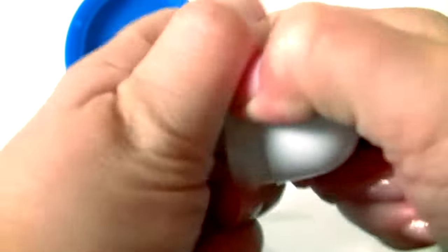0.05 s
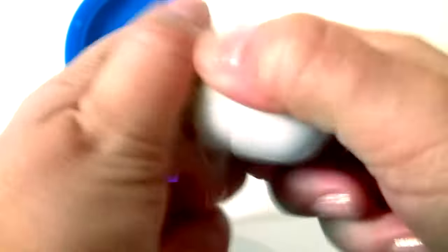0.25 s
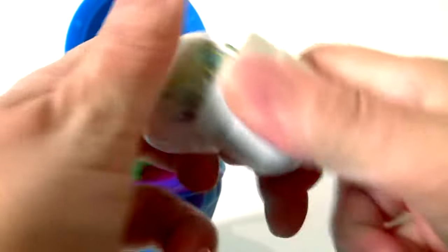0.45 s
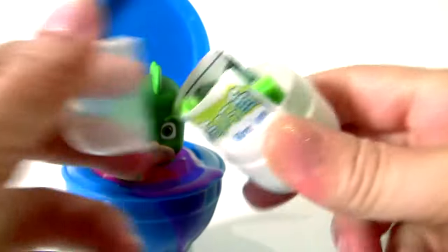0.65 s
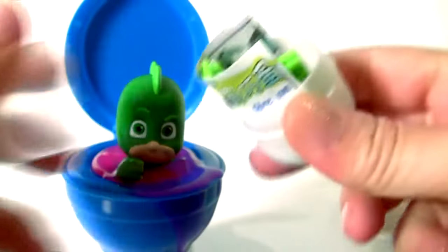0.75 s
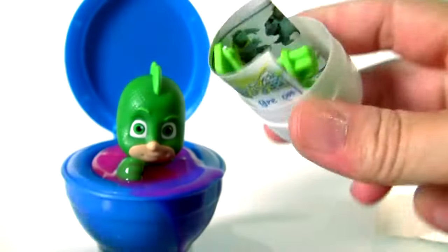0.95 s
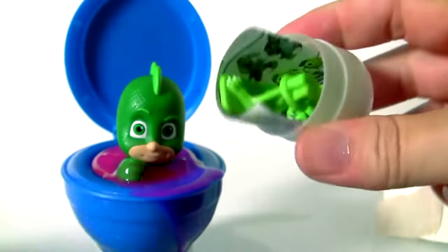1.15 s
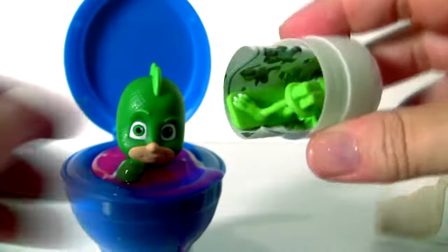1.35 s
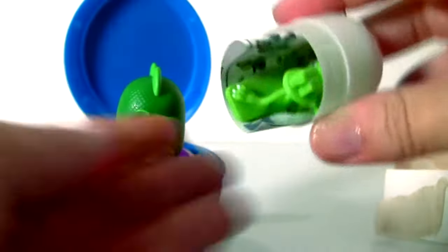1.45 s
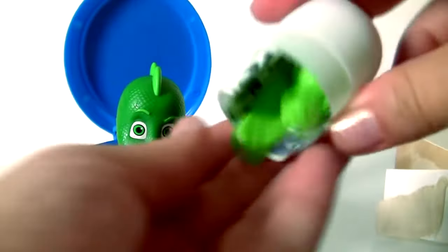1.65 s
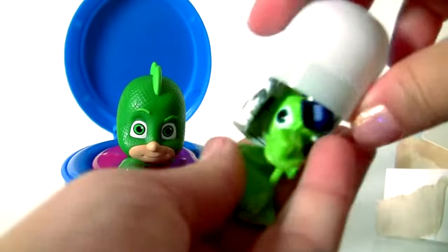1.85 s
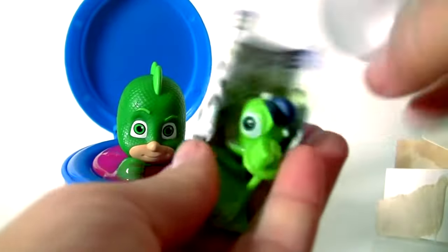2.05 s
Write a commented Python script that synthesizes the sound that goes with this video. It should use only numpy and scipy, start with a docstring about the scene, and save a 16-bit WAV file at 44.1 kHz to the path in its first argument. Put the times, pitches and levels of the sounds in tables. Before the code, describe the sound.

A small plastic capsule pops open with a hard snap and brief crackles, paper and plastic rustle, then a little toy rattles in the hollow cup; close microphone, quiet small room with faint hum.

```python
"""A quiet room lies under everything: noise air, a fan-like drone of narrow noise bands, two hum sines.
Hands rub a plastic egg capsule (grainy noise and moving resonances); edges ping (narrow noise bursts).
Shell and paper snap, hardest from 0.2 s (decaying thumps, cup rings, treble cracks).
From 1.14 s a small toy rattles in the cup (decaying modes, hard knocks tick; two sharp knocks are built
like snaps); late rubbing swells again. A short diffuse echo from the walls follows all close sounds."""
import sys
import numpy as np
from scipy import signal
from scipy.fft import rfft, irfft, next_fast_len
from scipy.io import wavfile
from scipy.ndimage import uniform_filter1d, map_coordinates

SR = 44100
rng = np.random.default_rng(int(sys.argv[2]) if len(sys.argv) > 2 else 0)


def to_wav(sig):
    """Store sig (one row per channel, or 1-D mono) as 16-bit WAV at the path in sys.argv[1].

    Samples outside -1..1 are clipped; the rate is SR.
    """
    pcm = np.clip(np.atleast_2d(sig), -1, 1) * 32767
    pcm = np.round(pcm).astype(np.int16)
    wavfile.write(sys.argv[1], SR, pcm.T)  # frames by channels


N = 92610
RISE_SHARE = 0.077  # rise time constant of snaps and pings over their t60


def amp(db):
    """Decibels to amplitude factor."""
    return 10 ** (np.asarray(db) / 20)


def unit(x):
    """x scaled to an rms of 1."""
    return x / np.sqrt(np.mean(np.abs(x) ** 2) + 1e-20)


def along(points, hz):
    """Interpolate (frequency, value) points on a log frequency axis."""
    f, v = np.transpose(points)
    return np.interp(np.log(hz + 1), np.log(f + 1), v)


def curves(rows):
    """One value per sample for each column after the time."""
    s, *cols = np.transpose(rows)
    return [np.interp(np.arange(N) / SR, s, c) for c in cols]


def wobble(knots_per_s):
    """Smooth random curve through normal knots."""
    knots = rng.standard_normal(int(N * knots_per_s / SR) + 4)
    return map_coordinates(knots, [np.arange(N) * knots_per_s / SR])


def filtered(x, response):
    """x times a complex response of frequency."""
    m = next_fast_len(N + SR // 2)
    return irfft(rfft(x, m) * response(np.fft.rfftfreq(m, 1 / SR)), m)[..., :N]


def passed(x, hz, kind, order):
    """Butterworth low- or high-pass."""
    return signal.sosfilt(signal.butter(order, hz, kind, fs=SR, output="sos"), x)


def peaks(rows):
    """Sum of causal second-order resonances with alternating sign."""
    def response(f):
        total = 0
        for k, (centre, width, db) in enumerate(rows):
            band = 1j * f * width
            total = total + (-1) ** k * amp(db) * band / (centre * centre - f * f + band)
        return total
    return response


def noise(response):
    """White noise through a response, at unit rms."""
    return unit(filtered(rng.standard_normal(N), response))


def coloured(points):
    """Noise with a (frequency, dB) spectrum, at unit rms."""
    return noise(lambda hz: amp(along(points, hz)))


def moving_ring(hz, width_hz):
    """Noise in one resonance: two slow noises modulate a carrier whose pitch follows a curve."""
    slow_cos, slow_sin = [noise(lambda f: 1 / (1 + 1j * f / width_hz) ** 2) for _ in "ab"]
    phase = 2 * np.pi * np.cumsum(hz) / SR
    return slow_cos * np.cos(phase) + slow_sin * np.sin(phase)


def pan(x, left_minus_right_db):
    """Split a level difference evenly between left and right."""
    half_db = left_minus_right_db / 2
    return x * amp([[half_db], [-half_db]])


# side noise against mid noise: (frequency [Hz], level [dB])
SIDE_SPREAD = [(1000, -53), (4000, -10), (8000, -4), (16000, -5)]


def wide(points):
    """Coloured stereo noise, less alike in the treble: independent side noise is added."""
    side = filtered(coloured(points), lambda hz: amp(along(SIDE_SPREAD, hz)))
    return coloured(points) + np.array([side, -side])


def patchy(x, depth_db):
    """x with patches of random gain in time and frequency, at unit rms."""
    z = signal.stft(x, nperseg=128)[2]
    field = rng.standard_normal(z.shape[-2:])
    field = uniform_filter1d(field, size=4, axis=0)
    field = uniform_filter1d(field, size=5, axis=1)
    return unit(signal.istft(z * amp(depth_db * unit(field)), nperseg=128)[1][..., :N])


# spectrum of room air: (frequency [Hz], relative density [dB per Hz])
AIR_SPECTRUM = [(20, -42), (45, -28), (100, -8), (250, -4), (600, -4.5), (1000, -11), (2000, -14.5),
                (4000, -26), (8000, -31), (14500, -32.5), (16000, -46)]
# air and drone between the sides: (frequency [Hz], left-right likeness [correlation])
AIR_LIKENESS = [(50, 0.044), (300, 0.31), (1000, 0.55), (5000, 0.043), (15000, 0.067)]
# narrow noise bands: (centre [Hz], width [Hz], relative level [dB])
DRONE_BANDS = [(345, 12.6, -1.5), (552, 17, -6), (779.3, 15.3, 1)]
# mains hum: (frequency [Hz], mean level [dB rms], left lead [rad])
HUM_TONES = [(30, -69, 0.8), (60, -69, 1.3)]
AIR_DB, DRONE_DB, AIR_PAN_DB = -55.5, -56, -1.7


def room():
    """Air noise and resonant drone, partly shared by the sides, plus hum sines of wavering level."""
    def turn(hz):
        return np.arccos(np.clip(along(AIR_LIKENESS, hz), -1, 1)) / 2

    pair = []
    for _ in "ab":
        air = amp(AIR_DB) * coloured(AIR_SPECTRUM)
        drone = amp(DRONE_DB + 1.5 * wobble(6.9)) * noise(peaks(DRONE_BANDS))
        pair.append(air + drone)
    mid, side = filtered(np.array(pair), lambda hz: np.array([np.cos(turn(hz)), np.sin(turn(hz))]))

    t, hum = np.arange(N) / SR, 0
    for hz, db, lead in HUM_TONES:
        tone = np.sin(2 * np.pi * hz * t + np.array([[lead], [0]]))
        hum = hum + 2 ** .5 * amp(db + 0.43 * wobble(3.9)) * tone
    return pan(np.array([mid + side, mid - side]), AIR_PAN_DB) + hum


# rubbing and sliding: (time [s], air ring of the cup [dB], upper rings [dB], treble rustle [dB],
# air ring pitch [Hz])
RUB_MOVES = [(0, -76, -91, -74, 1800), (.05, -84, -95, -63.5, 1810), (.2, -79, -68, -68.5, 1812),
             (.21, -56, -44, -35.5, 1800), (.275, -63, -66, -48, 1600), (.3, -48.5, -62, -48.5, 1543),
             (.335, -43, -53, -40, 1650), (.365, -54, -67, -50.5, 1652), (.395, -34, -83, -39, 1742),
             (.408, -53, -64, -54, 1722), (.43, -56.5, -70, -58, 1686), (.49, -60, -66, -61.5, 1736),
             (.6, -64, -89, -61, 1750), (.65, -50.5, -52, -48, 1750), (.7, -52, -56, -40.5, 2017),
             (.73, -49, -60, -50.5, 2033), (.82, -71, -59, -51, 2037), (.86, -86, -70, -60.5, 1908),
             (.97, -95, -84, -71, 1885), (1.14, -96, -80, -92, 1902), (1.17, -70, -75, -61, 1880),
             (1.3, -72, -94, -66, 1886), (1.7, -53.5, -73, -59.5, 1697), (1.76, -62, -51, -52.5, 1695),
             (1.82, -44, -42.5, -42, 1728), (1.85, -52, -65, -57.5, 1716), (1.895, -46.5, -56.5, -56, 1675),
             (1.95, -54, -60, -56.5, 1730), (2.03, -51.5, -44, -51.5, 1800),
             (2.1, -51.5, -55.5, -49.5, 1922)]
# upper rings of the cup: (centre [Hz], width [Hz], relative level [dB])
UPPER_RINGS = [(5400, 290, 5), (7550, 130, -7), (8880, 160, -4.5), (12900, 660, -9)]
# rustle spectrum: (frequency [Hz], relative density [dB per Hz])
RUSTLE_SPECTRUM = [(60, -24), (120, -2), (800, -0.5), (2500, 1), (4000, 1.5), (6300, -2), (8000, -1),
                   (10500, -8), (13000, -5.5), (16000, -8)]
RUB_RING_WIDTH_HZ = 176


def rubbing():
    """Grainy friction: patchy rustle noise plus the air ring of the cup and its upper rings."""
    ring_db, upper_db, treble_db, ring_hz = curves(RUB_MOVES)
    grain_db = 2.0 * wobble(150) + 2.3 * wobble(700)
    ring = amp(ring_db + 3.2 * wobble(110)) * moving_ring(ring_hz, RUB_RING_WIDTH_HZ)
    upper = amp(upper_db + 2.0 * wobble(91)) * noise(peaks(UPPER_RINGS))
    rustle = amp(treble_db + grain_db) * patchy(wide(RUSTLE_SPECTRUM), depth_db=3)
    return ring + upper + rustle


# treble pings of plastic edges: (time [s], level [dB], pitch [Hz], t60 [s])
EDGE_PINGS = [(0.036, -45, 3620, 0.036), (0.2055, -20, 6400, 0.0089), (0.2215, -30, 6350, 0.019),
              (0.2432, -16.5, 12200, 0.01), (0.2449, -19.5, 6200, 0.0092), (0.647, -34.5, 5700, 0.036),
              (0.7802, -33.5, 4300, 0.02), (2.076, -31.5, 4370, 0.025)]
PING_WIDTH, PING_HISS = 0.07, 0.28  # bandwidth over pitch; gain of broad noise


def pings():
    """Each plastic edge gives a decaying noise burst in one narrow treble resonance."""
    t, out = np.arange(SR // 20) / SR, np.zeros(N + SR)
    for s, db, hz, t60 in EDGE_PINGS:
        at = round(s * SR)
        hiss = passed(rng.standard_normal(len(t)), hz / 2, "high", order=2)
        ring = unit(signal.lfilter(*signal.iirpeak(hz, 1 / PING_WIDTH, fs=SR), hiss))
        envelope = amp(db - 60 * t / t60) * (1 - np.exp(-t / (RISE_SHARE * t60)))
        out[at:][:len(t)] += unit(ring + PING_HISS * hiss) * envelope
    return out[:N]


# shell cracks, paper snaps and two sharp toy knocks (near 1.63 and 1.65 s): (time [s], level [dB],
# thump [dB], thump pitch [Hz], cup ring [dB], treble [dB], ring and treble t60 [s]);
# the parts are relative to the level
SNAP_EVENTS = [(0.0578, -35, -5, 774, 0, -1, 0.0067), (0.204, -3, -8.5, 583, -6, -2, 0.021),
               (0.2082, -8, -2, 322, -11, -14, 0.012), (0.2219, -17.5, 0, 987, 4, -6, 0.016),
               (0.2432, -18.5, -8.5, 466, -17, -4.5, 0.015), (0.2458, -20, -1, 1200, -15, -23, 0.0084),
               (0.31, -30.5, -6, 770, 9.5, -10, 0.017), (0.3338, -21.5, -10, 620, -4, -3, 0.0065),
               (0.3707, -11, -8.5, 742, -1.5, -3, 0.015), (0.3863, -30, -2, 676, -11, -24, 0.016),
               (0.394, -28.5, -7, 730, 1, 4, 0.026), (0.3976, -16.5, -7.5, 790, 3, -7.5, 0.0094),
               (0.4226, -31.5, -16, 710, -5, -0.5, 0.015), (0.4744, -37.5, -11, 603, 3, -10, 0.025),
               (0.543, -35.5, -5.5, 480, -15, 1.5, 0.02), (0.6227, -32, -15, 670, 2, -1.5, 0.02),
               (0.679, -23, -4, 772.6, -4.5, -6, 0.0074), (0.7069, -12.5, -9.5, 620, 5, -4, 0.01),
               (0.7606, -30, -6, 810, -4.5, -6, 0.02), (0.9993, -42, -8, 770, 6, -9, 0.01),
               (1.1442, -25.5, -5.5, 801, -21, -5, 0.015), (1.6315, -29, -15, 800, -19, -2, 0.015),
               (1.6524, -36, -10, 796.8, -10, -3, 0.014), (1.7648, -30.5, -4, 1273, 5, -7, 0.015),
               (1.7943, -26, -7.5, 396, 8, -22, 0.014), (1.8186, -20.5, -27, 1301, 1, 0.5, 0.0097)]
# crack spectrum: (frequency [Hz], relative density [dB per Hz])
CRACK_SPECTRUM = [(900, -16.5), (2800, 4), (4500, -4.5), (6400, 1), (7600, -9.5), (12000, -10),
                  (16000, -16)]
THUMP_T60_S, THUMP_RISE_S = 0.017, 0.00099
THUMP_OVER, THUMP_OVER_DB = 2, -7.5  # second mode of the held shell: pitch ratio, level
HELD_LOW_HZ, SNAP_RING_WIDTH_HZ = 134, 380


def snaps():
    """Each event thumps the held shell (two sines), rings the cup and cracks in the treble (noise)."""
    t = np.arange(SR // 12) / SR
    cup_hz = curves(RUB_MOVES)[3]
    body, ring, crack = np.zeros((3, N + SR))
    for s, db, thump_db, hz, ring_db, treble_db, t60 in SNAP_EVENTS:
        at = round(s * SR)
        fall = (1 - np.exp(-t / (RISE_SHARE * t60))) * amp(db - 60 * t / t60)
        thump_fall = amp(db + thump_db - 60 * t / THUMP_T60_S) * (1 - np.exp(-t / THUMP_RISE_S))
        over = amp(THUMP_OVER_DB) * np.sin(2 * np.pi * THUMP_OVER * hz * t)
        cup_tone = 0.73 * amp(ring_db) * fall * np.sin(2 * np.pi * cup_hz[at] * t)
        body[at:][:len(t)] += thump_fall * (np.sin(2 * np.pi * hz * t) + over) + cup_tone
        ring[at:][:len(t)] += amp(ring_db) * fall
        crack[at:][:len(t)] += amp(treble_db) * fall
    body = passed(body[:N], HELD_LOW_HZ, "high", order=2)
    ring_noise = 0.34 * ring[:N] * moving_ring(cup_hz, SNAP_RING_WIDTH_HZ)
    return body + ring_noise + 0.64 * crack[:N] * wide(CRACK_SPECTRUM)


# toy knocking in the cup: (time [s], relative level [dB], centre of its colour [Hz])
TOY_KNOCKS = [(1.1447, -23, 2170.0), (1.2121, -24, 1800.0), (1.2378, -31, 1610.0), (1.267, -30, 2510.0),
              (1.2763, -25, 1740.0), (1.2851, -19, 2450.0), (1.2959, -21, 2280.0), (1.3005, -13, 2360.0),
              (1.3075, -13, 2420.0), (1.3548, -25, 1940.0), (1.3593, -20, 2170.0), (1.3631, -23, 2050.0),
              (1.3687, -19, 2250.0), (1.3841, -18, 2250.0), (1.4335, -23, 1920.0), (1.4371, -15, 2000.0),
              (1.4402, -22, 2110.0), (1.4425, -15, 1870.0), (1.4703, -19, 1740.0), (1.496, -26, 1590.0),
              (1.5001, -21, 1640.0), (1.5027, -8, 1830.0), (1.5063, -10, 1900.0), (1.5094, -22, 1440.0),
              (1.5392, -21, 1560.0), (1.5486, -24, 1350.0), (1.5529, -18, 1590.0), (1.5559, -11, 1700.0),
              (1.5761, -31, 1440.0), (1.5955, -24, 1490.0), (1.5988, -19, 1510.0), (1.6027, -12, 1600.0),
              (1.6119, -18, 1590.0), (1.6318, -18, 2100.0), (1.6374, -18, 1600.0), (1.6539, -24, 1660.0),
              (1.6627, -29, 1280.0)]
# base level of the small knocks between: (time [s], relative level [dB])
SHAKE_LEVEL = [(1.14, -71), (1.2, -48.5), (1.26, -50), (1.33, -47), (1.40, -47), (1.46, -48.5),
               (1.52, -45.5), (1.58, -45), (1.66, -44.5), (1.72, -53.5), (1.76, -57)]
# modes of the cup: (frequency before detuning [Hz], level before scatter [dB], t60 [s])
CUP_MODES = [(348, -0.5, 0.029), (1150, -11.5, 0.029), (1355, -1, 0.032), (1563, -5.5, 0.027),
             (1860, 3.5, 0.014), (2102, -1.5, 0.013), (2345, -3, 0.015), (3430, -12, 0.0082)]
PATTER_PER_S, PATTER_SPREAD_DB, PATTER_HZ = 990, 4.5, 1790  # small knocks
COLOUR_OCT, KNOCK_RISE_S = 0.39, 0.00014  # offset where a mode is 6 dB down; rise time constant
# std of random detuning (share) and level scatter of each mode, so knocks vary in colour
DETUNE, SCATTER_DB = 0.05, 5.5
TICK_HZ, TICK_DB, TICK_GROWS, TICK_T60_S = 7330, -33, 2.76, 0.016  # growth in dB per dB of knock
CUP_LOW_HZ, CUP_HIGH_HZ = 634, 3080  # a small cup sends out little bass; soft contacts little treble


def rattle():
    """Knocks, listed and random small ones, ring the cup modes near their colour; hard ones also tick."""
    start, end = SHAKE_LEVEL[0][0], SHAKE_LEVEL[-1][0]
    draw = rng.random((int(PATTER_PER_S * (end - start)), 3))
    when = start + (end - start) * draw[:, 0]
    size_db = PATTER_SPREAD_DB * np.minimum(-np.log(draw[:, 1]), 2.5)
    small_db = np.interp(when, *np.transpose(SHAKE_LEVEL)) + size_db
    small = np.c_[when, small_db, PATTER_HZ * 2 ** (draw[:, 2] - .5)]
    rows = np.r_[TOY_KNOCKS, small]

    t = np.arange(SR // 25) / SR
    out, tick = np.zeros((2, N + SR))
    hz, level_db, t60 = np.transpose(CUP_MODES)
    variations = rng.standard_normal((len(rows), 2, len(CUP_MODES)))
    for (s, db, centre), (scatter, shift) in zip(rows, variations):
        at = round(s * SR)
        reach_db = np.maximum(-6 * (np.log2(hz / centre) / COLOUR_OCT) ** 2, -8)
        gain = amp(level_db + reach_db + SCATTER_DB * scatter)
        mode_hz = hz * (1 + DETUNE * shift)
        modes = amp(-60 * t / t60[:, None]) * np.sin(2 * np.pi * mode_hz[:, None] * t)
        rise = 1 - np.exp(-t / KNOCK_RISE_S)
        # the lowest mode does not count towards the level
        out[at:][:len(t)] += amp(db + 5) * rise * (gain @ modes) / gain[1:].sum()
        tick[at:][:len(t)] += amp(TICK_DB + TICK_GROWS * (db + 6.5) - 60 * t / TICK_T60_S)
    soft = passed(out[:N], CUP_HIGH_HZ, "low", order=5)
    soft = passed(soft, CUP_LOW_HZ, "high", order=3)
    return soft + tick[:N] * noise(peaks([(TICK_HZ, 450, 0), (4100, 1200, -9), (12000, 6000, -18)]))


# decay of the room's answer: (frequency [Hz], t60 [s])
WALL_DECAY = [(200, 0.073), (2000, 0.073), (10000, 0.037)]


def walls(x):
    """Diffuse echo: convolution with stereo noise in which each frequency dies at its own speed."""
    hz, t, z = signal.stft(rng.standard_normal((2, SR // 3)), SR, nperseg=256)
    fall = amp(-60 * t / along(WALL_DECAY, hz)[:, None])
    tail = signal.istft(z * fall, SR, nperseg=256)[1]
    late = np.pad(x, ((0, 0), (100, 0)))  # 100 samples later
    return signal.fftconvolve(late, tail / np.linalg.norm(tail[0]), axes=1)[:, :N]


HANDS_PAN_DB, TOY_PAN_DB, WALLS_DB = -1.5, -0.1, -12


def scene():
    """Pan hands and toy, then add their wall echo and the room."""
    hands = pan(rubbing() + pings() + snaps(), HANDS_PAN_DB)
    toy = rattle()
    toy = np.array([np.roll(toy, shift=1), toy])  # nearer the right side by one sample
    near = hands + pan(toy, TOY_PAN_DB)
    return near + amp(WALLS_DB) * walls(near) + room()


TOP_HZ = 15850


def record(dry):
    """Sharp band limit: nothing at or above TOP_HZ is kept."""
    return filtered(dry, lambda hz: hz < TOP_HZ)


dry = scene()
out = record(dry)
to_wav(out)
```